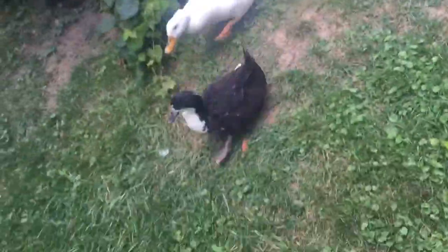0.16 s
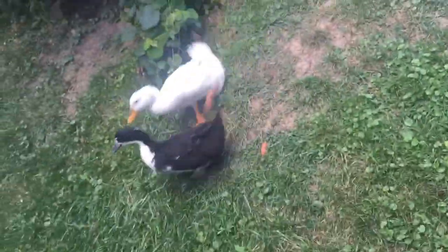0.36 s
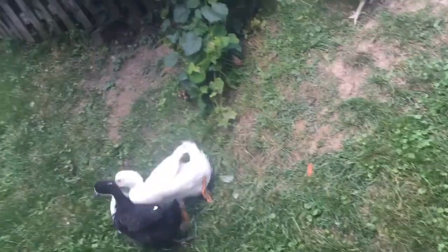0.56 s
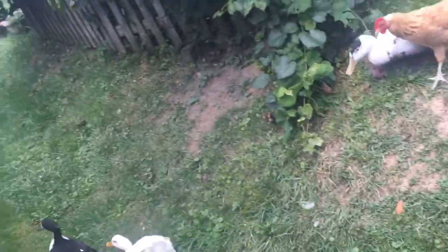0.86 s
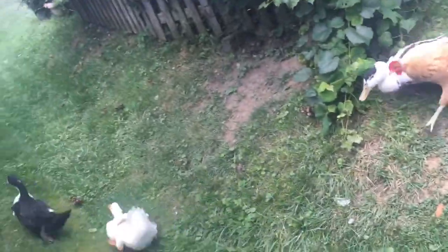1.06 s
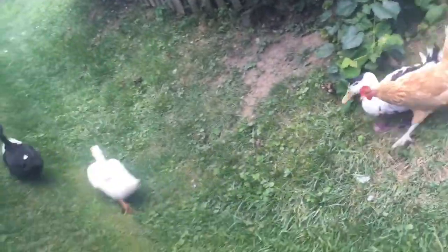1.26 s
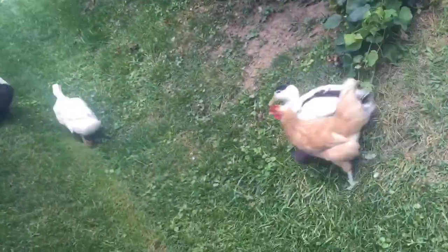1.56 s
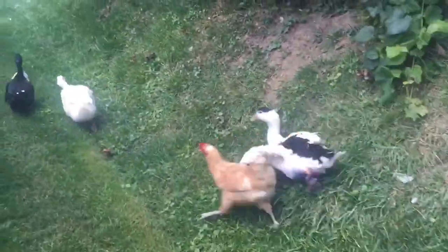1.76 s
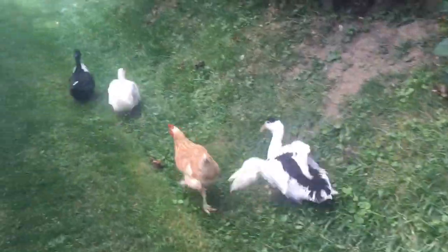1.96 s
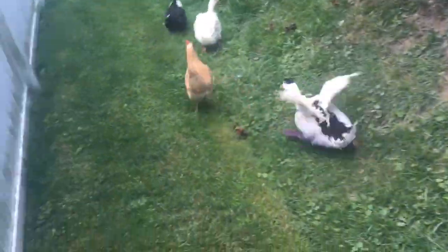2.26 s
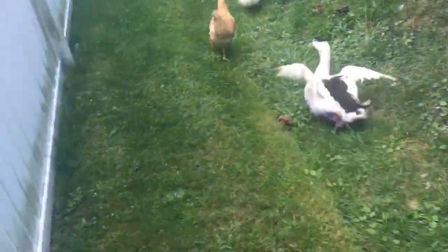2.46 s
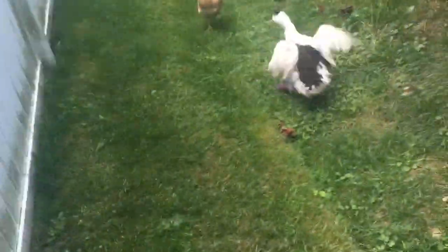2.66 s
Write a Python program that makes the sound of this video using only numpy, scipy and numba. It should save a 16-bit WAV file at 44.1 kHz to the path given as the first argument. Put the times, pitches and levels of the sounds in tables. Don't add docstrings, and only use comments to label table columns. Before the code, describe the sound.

A close duck gives short buzzing quacks about four a second, some with a creak before them; a hoarse, whistling duck answers later, with soft clucks, thumps on the handheld microphone and faint outdoor wind.

```python
import sys
import numpy as np
from scipy import signal
from scipy.io import wavfile
from scipy.ndimage import uniform_filter1d
from numba import njit

SR = 44100
rng = np.random.default_rng(int(sys.argv[2]) if len(sys.argv) > 2 else 0)


def generate_wav(signal):
    frames = np.transpose(np.atleast_2d(signal))
    scaled = np.clip(frames, -1, 1) * 32767
    pcm = np.round(scaled).astype(np.int16)
    wavfile.write(sys.argv[1], SR, pcm)


def amplitude_ratio(level_db):
    exponent = np.asarray(level_db, float) / 20
    return 10 ** exponent


N = 123479


def level(x, db):
    return x * amplitude_ratio(db) / np.sqrt(np.mean(x ** 2))


def walk(rate):
    hold = int(SR / rate)
    steps = np.repeat(rng.standard_normal(N // hold + 1), hold)
    return 1.1 * uniform_filter1d(uniform_filter1d(steps, hold), hold)[:N]


def shape(t, length, attack=0.0027, release=0.021, swell=0.35):
    edges = np.clip(t / attack, 0, 1) * np.clip((length - t) / release + .5, 0, 1)
    arch = 1 - swell * np.clip(2 * t / length - 1, -1, 1) ** 2
    return np.sin(np.pi / 2 * edges) ** 2 * arch


@njit
def svf(x, hz, width, bend):
    y, band, low = np.empty(len(x)), 0., 0.
    rest, damping = np.tan(np.pi * hz / SR), width / hz
    for i in range(len(x)):
        g = rest * bend[i]
        v = (band + g * (x[i] - low)) / (1 + g * (g + damping))
        band = 2 * v - band
        low = low + 2 * g * v
        y[i] = damping * v
    return y


def twice(x, hz, width, bend=np.ones(N)):
    once = svf(x, 1. * hz, 1. * width, bend)
    return 0.019 * once + svf(once, 1. * hz, 1.47 * width, bend)


@njit
def fire(hz, jitter, shimmer, chance):
    pulses, phase, p, k = np.zeros(len(hz) + 1), np.empty(len(hz)), 0., 0
    for i in range(len(hz)):
        step = hz[i] * (1 + jitter[i] * chance[k, 0]) / SR
        p += step
        if p >= 1:
            p, k = p - 1, k + 1
            size = np.exp(shimmer[i] * chance[k, 1])
            pulses[i] += size * p / step
            pulses[i + 1] += size * (1 - p / step)
        phase[i] = p
    return pulses[:-1], phase


def cycle_chance():
    return np.clip(rng.standard_normal((2000, 2)), -2, 2)


def syrinx(calls, rough_of, sag, breath_db, swell, attack):
    t = np.arange(N) / SR
    rows = np.array(calls)
    start, length, _, pitch, extra = rows[np.clip(np.searchsorted(rows[:, 0], t) - 1, 0, None)].T
    u = np.clip((t - start) / length, 0, 1.2)
    hz = pitch * (1 - 0.09 * np.exp(-u / 0.2) - sag * u ** 2.6) * (1 + .015 * walk(30))
    rough = np.clip(rough_of(extra, u), 0, 1)
    pulses, phase = fire(hz, .08 * rough, .3 * rough, cycle_chance())
    air = level(rng.standard_normal(N) * np.exp(-phase / .42), 0)
    voice = level(pulses - hz / SR, 0) + amplitude_ratio(breath_db) * rough * air
    bend = (hz / pitch) ** .25
    gain = sum(amplitude_ratio(db) * shape(t - s, length, attack, swell=swell) for s, length, db, *_ in calls)
    return (voice, air, bend), gain, extra


def effort_of(calls, peak, spread):
    t = np.arange(N) / SR
    humps = [np.exp(-(((t - s) / length - peak) / spread) ** 2) for s, length, *_ in calls]
    return np.max(humps, axis=0)


def tract(source, gain, effort, hz, width, hiss):
    voice, air, bend = source
    above = max(hz / 1000 - 1, 0)
    head_turn = amplitude_ratio(3.5 * min(above + 0.33, 1) * walk(16))
    drive = (voice + hiss * above * air) * head_turn
    return twice(drive * gain * effort ** (.38 * above), hz, width, bend * (1 + .015 * walk(13)))


def lead():
    # (time [s], length [s], level [dB], pitch [Hz], beak opening [dB])
    quacks = [
        (.07, 0.037, -23.5, 232.3, -10),
        (.311, 0.069, -25.5, 222.9, -9),
        (.57, 0.062, -18, 224.5, -13.5),
        (.821, 0.074, -20, 235.1, -13),
        (1.085, 0.067, -19.5, 245.1, -11.5),
        (1.337, 0.074, -18, 244, -10),
        (1.612, .072, -21.5, 243.9, -6.5),
        (1.878, 0.062, -26.5, 270.1, 3.5),
        (2.136, 0.057, -25.5, 258.3, 3.5),
        (2.418, 0.065, -26.5, 265.3, 4.5),
    ]
    # (centre [Hz], width [Hz], level [dB], share of beak opening [0-1])
    resonances = [(285.4, 128, -12.5, 0.49), (777, 248, -23.5, 0.23), (1098, 141, -10, 0.61),
                  (1679, 221, -1.5, 0.012), (2294, 298, -5, 1), (2758, 417, -14.5, 0.72),
                  (4315, 855, -23.5, 0.65), (5936, 600, -34, 0.11), (6960, 240, -39.5, 0.72),
                  (8250, 810, -47, 1), (11700, 1300, -63.5, 1)]

    def rough_of(beak, u):
        return .085 + .4 * np.exp(-u / .1) + .55 * u ** 5

    source, gain, beak = syrinx(quacks, rough_of, sag=0.26, breath_db=0.59, swell=0.14, attack=.01)
    effort = effort_of(quacks, 0.38, 0.66)
    out = 0
    for k, (hz, width, db, share) in enumerate(resonances):
        ring = tract(source, gain, effort, hz, width, hiss=.14)
        out = out + (-1) ** k * amplitude_ratio(db + share * beak) * ring
    strongest = twice(source[0], *resonances[3][:2])
    return out / np.sqrt(np.mean(strongest ** 2))


def creaks():
    # (time [s], length [s], level [dB], pulse rate [Hz], throat [Hz])
    slow_calls = [
        (0.272, 0.067, -35.5, 130, 1600),
        (0.489, 0.082, -31, 102, 1600),
        (1.031, 0.09, -28, 96, 1580),
        (1.259, 0.073, -31, 114, 1890),
    ]
    t, out = np.arange(N) / SR, 0
    for s, length, db, rate, hz in slow_calls:
        u = np.clip((t - s) / length, 0, 1)
        pulse_hz = rate * (t > s - .9 / rate) * (1 + .3 * u)
        pulses, phase = fire(pulse_hz, np.full(N, .16), np.full(N, .45), cycle_chance())
        air = level(rng.standard_normal(N) * np.exp(-phase / .4), 0)
        drive = twice(level(pulses, 0) + 1.6 * air, 2200., 3000.)
        bend = 1 + 0.034 * u

        def ring(f, width):
            return level(twice(drive, f, width, bend), 0)

        body = ring(hz, 300)
        body = body + amplitude_ratio(-13) * u * (ring(2300, 410) + ring(3050, 500))
        body = body + amplitude_ratio(-8.5) * ring(1167, 240)
        out = out + amplitude_ratio(db + 8.5 * (u - 1)) * shape(t - s, length, 0.009, 0.011, 0) * body
    return out


def hoarse():
    # (time [s], length [s], level [dB], pitch [Hz], roughness [0-1])
    calls = [
        (-.04, 0.1, -27, 245.8, 0.45),
        (1.441, 0.06, -28, 251, 0.37),
        (1.588, 0.063, -23.5, 242, 0.24),
        (1.725, 0.16, -26, 245.6, 0.21),
        (1.93, 0.12, -28, 283.7, 0.49),
        (2.04, 0.093, -27.5, 278.9, 0.44),
        (2.166, 0.039, -31, 240, .5),
        (2.268, .15, -27, 264.8, 0.39),
        (2.638, 0.085, -31, 256.8, 0.45),
        (2.79, 0.051, -34, 240.7, 0.75),
    ]
    # (centre [Hz], width [Hz], level [dB])
    resonances = [(307, 188, -14.5), (1036, 263, -7), (1600, 311, -1), (2520, 313, -16.5), (3280, 230, -23),
                  (3923, 510, -32.5), (5340, 450, -45.5), (7250, 190, -50), (753, 350, -29.5)]
    # (time [s], level [dB])
    opening = [(0, 9.5), (0.034, -9), (1.44, -1.5), (1.74, -4.5), (1.79, 7), (1.85, 9), (1.89, -3),
               (1.95, -4), (2.015, 10), (2.045, 8), (2.085, 6), (2.13, 5.5), (2.27, -10), (2.3, 5.5),
               (2.35, -8), (2.4, -1), (2.66, -10.5), (2.8, 2.5)]
    source, gain, rough = syrinx(calls, lambda c, u: c, sag=0.16, breath_db=6.8, swell=0.44, attack=0.012)
    gain = gain * amplitude_ratio(5.5 * rough * walk(60))
    effort = effort_of(calls, 0.47, 0.5)
    beak = np.interp(np.arange(N) / SR, *np.array(opening).T)
    out = 0
    for k, (hz, width, db) in enumerate(resonances):
        ring = tract(source, gain, effort, hz, width, hiss=0.26)
        out = out + (-1) ** k * amplitude_ratio(db + (hz > 2000) * beak) * ring
    strongest = twice(source[0], *resonances[2][:2])
    return out / np.sqrt(np.mean(strongest ** 2))


def whistles():
    # (time [s], length [s], level [dB], pitch [Hz], glide [Hz/s])
    lines = [(-.02, 0.044, -23.5, 1502, -900), (0.037, 0.016, -22.5, 1600, -2000),
             (.012, 0.02, -25.5, 1057, -2500), (.038, 0.013, -31, 987, -4000),
             (1.455, 0.04, -17.5, 1552, -3), (1.753, 0.028, -21, 1560, 312.5),
             (1.783, 0.065, -18, 1573, 200), (1.85, 0.012, -27, 1600, 96), (1.981, 0.012, -14.5, 1640, 290),
             (2.01, .018, -21, 1700, 294), (2.04, 0.049, -20, 1694, -500),
             (2.089, 0.025, -22.5, 1664, -900), (2.281, 0.048, -22.5, 1600, -300),
             (2.325, 0.024, -14.5, 1625, 104.5), (2.363, 0.036, -24, 1631, 102),
             (2.395, 0.022, -21, 1674, 104), (2.655, 0.079, -32.5, 1516, -1300),
             (2.724, 0.027, -47, 1441, -300), (2.198, 0.072, -52, 1775, -3)]
    t, out = np.arange(N) / SR, 0
    waver = np.cumsum(24 * walk(90)) / SR
    flutter = amplitude_ratio(1.5 * walk(120))
    for s, length, db, hz, glide in lines:
        turns = (hz + glide * (t - s) / 2) * (t - s) + waver
        out = out + amplitude_ratio(db - 1.5) * shape(t - s, length, 0.0052, 0.015) * np.sin(2 * np.pi * turns)
    return out * flutter


def clucks():
    # (time [s], length [s], air level [dB], tone level [dB], throat [Hz])
    soft_notes = [(0.376, 0.011, -37.5, -59, 793), (0.407, 0.017, -41.5, -33.5, 1084),
                  (0.419, 0.024, -49, -44, 795), (0.719, 0.0048, -37.5, -35, 1222),
                  (0.772, 0.021, -39, -31.5, 1185), (2.792, 0.037, -36, -51, 2260),
                  (0.101, 0.024, -35.5, -56.5, 2050), (1.561, 0.02, -39, -66, 1503),
                  (-.01, 0.029, -39, -59, 3010), (0.762, 0.037, -57.5, -49, 2290),
                  (2.614, 0.0055, -38, -60, 2030)]
    t, out = np.arange(N) / SR, 0
    air = rng.standard_normal(N) * amplitude_ratio(1.0 * walk(148.5))
    side = level(twice(air, 1100.0, 440.0), -10.0)
    side = side + level(twice(twice(air, 2100.0, 1200.), 2800., 1500.), -22.0)
    for s, length, air_db, tone_db, hz in soft_notes:
        tone = np.sin(2 * np.pi * hz * (t - s) * (1.05 - 2.5 * (t - s)))
        puff = level(twice(air, hz, 0.11 * hz), 0) + side
        gain = shape(t - s, length, 0.22 * length, 0.046 * length)
        out = out + gain * (amplitude_ratio(tone_db) * tone + amplitude_ratio(air_db) * puff)
    return out


def thumps():
    # (time [s], peak level [dB], extra turns at the start [cycles], decay t60 [s])
    blows = [(0.04, -17.5, 0.18, 0.13), (0.103, -18.5, 0.61, 0.27), (0.1441, 5, 1.624, 0.093),
             (0.291, -29.5, 0.68, 0.14), (0.422, -25.5, 0.12, 0.16), (0.534, -25, 0.11, 0.19),
             (0.68, -44, 0.22, 0.63), (0.78, -13.5, 0.14, 0.063), (0.848, -26.5, 0.073, 0.23),
             (1.001, -37.5, 0.16, 0.39), (1.223, -36, 0.53, 0.48), (1.299, -23, 0.57, 0.13),
             (1.349, -17.5, 0.45, 0.089), (1.424, -23.5, 0.36, 0.16), (1.522, -36, 0.3, 0.65),
             (1.886, -15.5, 0.45, 0.12), (1.996, -24, 0.25, 0.14), (2.219, -7.5, 0.19, 0.089),
             (2.467, -12, 0.17, 0.1), (2.548, -17.5, 1.28, 0.13), (2.674, -16, 0.69, 0.14),
             (2.719, -32, 0.47, 0.51)]
    end_hz, slows_s, crack_db = 64.6, 0.003, -33.5
    out, air = 0, twice(rng.standard_normal(N), 2000.0, 3500.)
    for s, db, turns, t60 in blows:
        t = np.clip(np.arange(N) / SR - s, 0, None)
        cycles = end_hz * t + turns * (1 - np.exp(-t / slows_s))
        onset = 1 - np.exp(-(t * turns / 0.0027) ** 2)
        swing = -np.sin(2 * np.pi * cycles) * onset
        snap = (t > 0) * (np.exp(-t / 0.00032) + 0.27 * np.exp(-t / 0.0089))
        crack = amplitude_ratio(crack_db) * turns ** 2 * air * snap
        out = out + amplitude_ratio(db) * (swing * amplitude_ratio(-60 * t / t60) + crack)
    return out


def feathers():
    # (time [s], length [s], level [dB])
    rustles = [
        (2.295, .016, -56.5),
        (2.69, 0.038, -68.5),
        (2.1, 0.049, -64.5),
        (5.4, .06, -68.5),
    ]
    mic_hiss_db = -84
    t = np.arange(N) / SR
    gain = sum(amplitude_ratio(db) * shape(t - s, length, 0.022, .02) for s, length, db in rustles)
    gain = gain * amplitude_ratio(3.5 * walk(69))
    hiss = level(svf(rng.standard_normal(N), 13000.0, 6000.0, np.ones(N)), 0)
    return hiss * (gain + amplitude_ratio(mic_hiss_db))


def yard():
    # (frequency [Hz], level per Hz [dB])
    spectrum = np.array([(30, -7.5), (70, 7.5), (250, -13.5), (480, -21), (1500, -17.5), (3500, -37),
                         (6000, -41.5), (15500, -64.5)])
    yard_db, flock_db = -45, -58
    out, swell = 0, walk(1.0)
    for hz in 30 * 2 ** np.arange(0, 9.2, .5):
        db = np.interp(np.log(hz), np.log(spectrum[:, 0]), spectrum[:, 1])
        db = db + 0.84 * swell + (3.2 if hz < 300 else 1.5) * walk(3.4)
        out = out + amplitude_ratio(db) * twice(rng.standard_normal(N), hz, hz / 3.4)
    flock = twice(rng.standard_normal(N), 1600., 640.0) * amplitude_ratio(6.5 * walk(23))
    hush = 1 - 0.54 * shape(np.arange(N) / SR - 0.1615, 0.098, .01, 0.041, 0)
    return (level(out, yard_db) + level(flock, flock_db)) * hush


def scene():
    echo_db, echo_t60_s = -10, 0.097
    birds = lead() + hoarse() + whistles() + clucks() + creaks()
    t = np.arange(SR // 2) / SR
    tail = rng.standard_normal(len(t)) * amplitude_ratio(-60 * t / echo_t60_s) * (t > .004)
    tail = tail / np.sqrt(np.sum(tail ** 2))
    wet = signal.fftconvolve(twice(birds, 1100.0, 2700.0), tail)[:N]
    return (birds + amplitude_ratio(echo_db) * wet + thumps() + yard() + feathers())[None]


def roll_off(x):
    return signal.sosfilt(signal.butter(12, 15800, fs=SR, output="sos"), x)


def record(dry):
    clip, knee = 0.63, 5.2
    soft = dry / (1 + (np.abs(dry) / clip) ** knee) ** (1 / knee)
    return roll_off(soft)


dry = scene()
out = record(dry)
generate_wav(out)
```